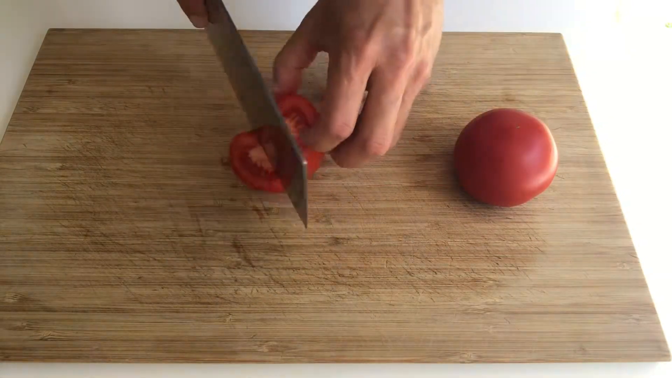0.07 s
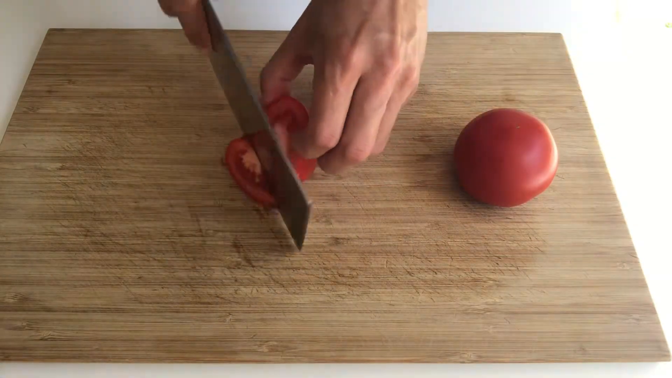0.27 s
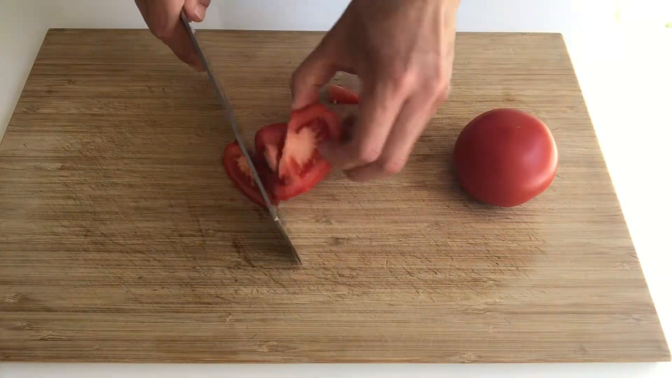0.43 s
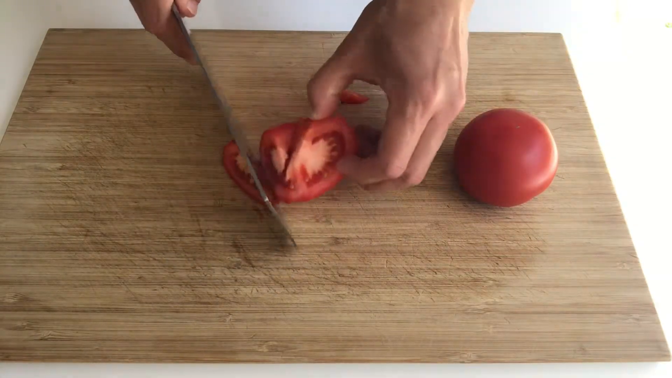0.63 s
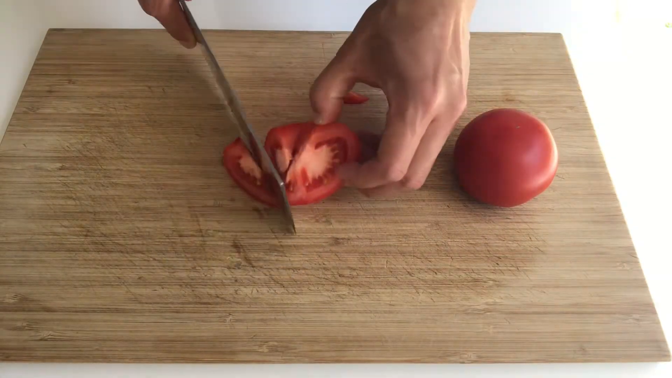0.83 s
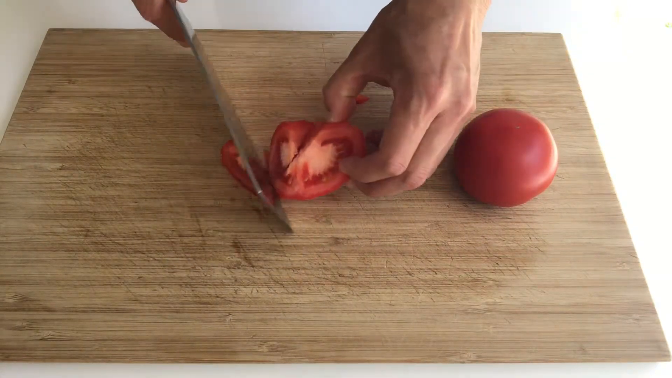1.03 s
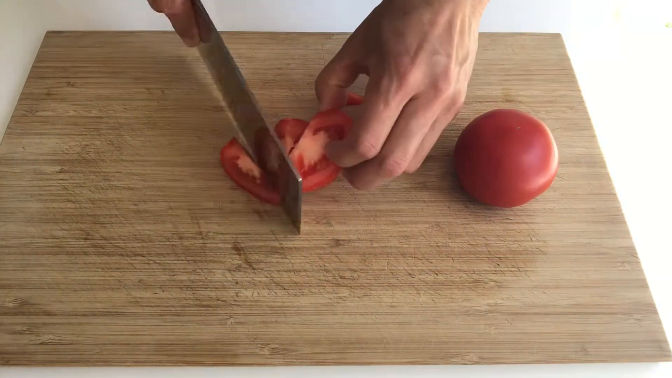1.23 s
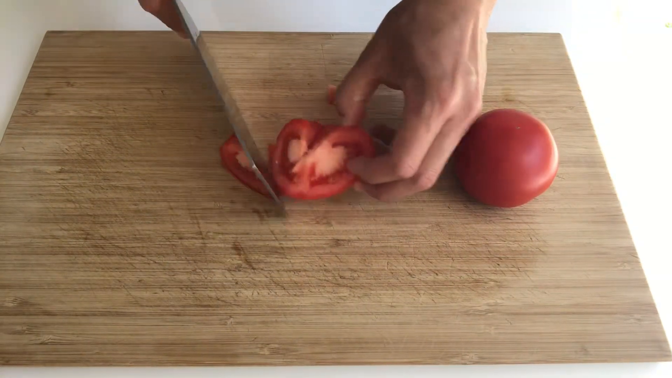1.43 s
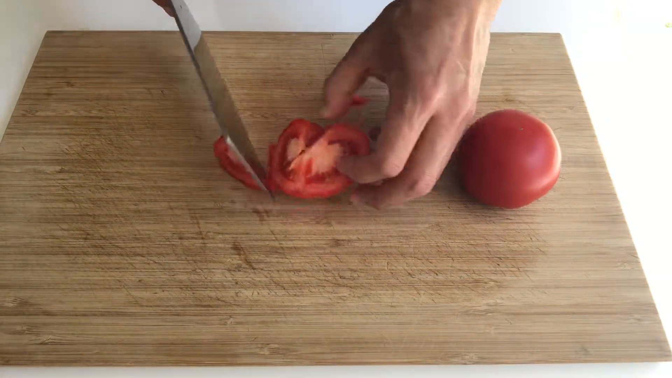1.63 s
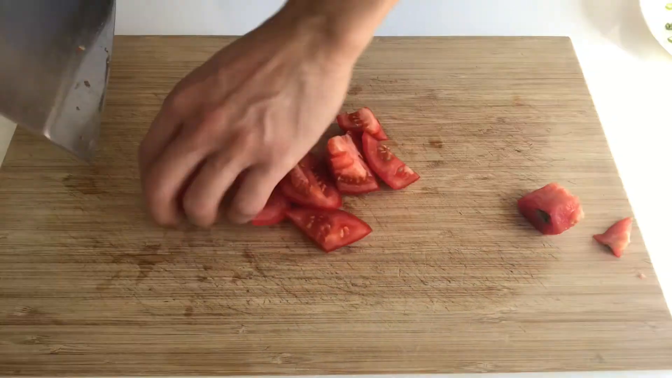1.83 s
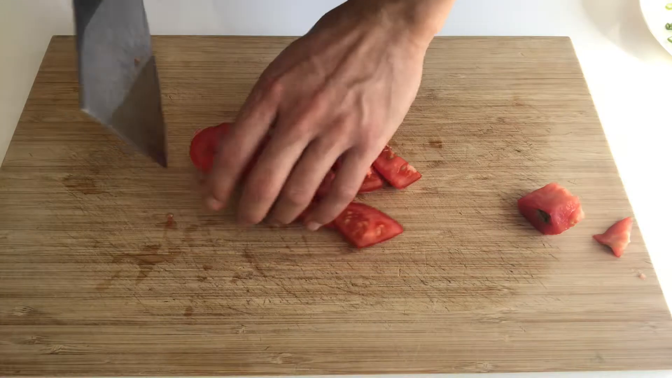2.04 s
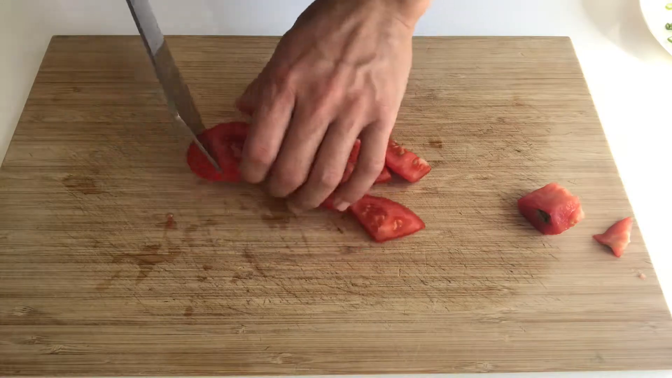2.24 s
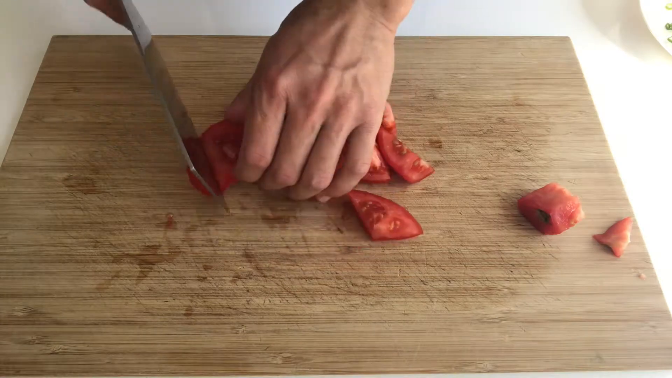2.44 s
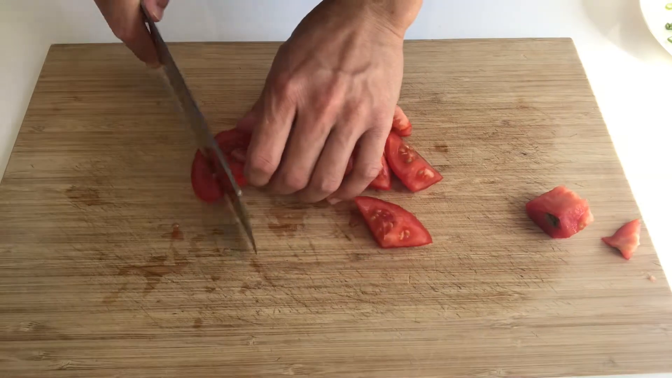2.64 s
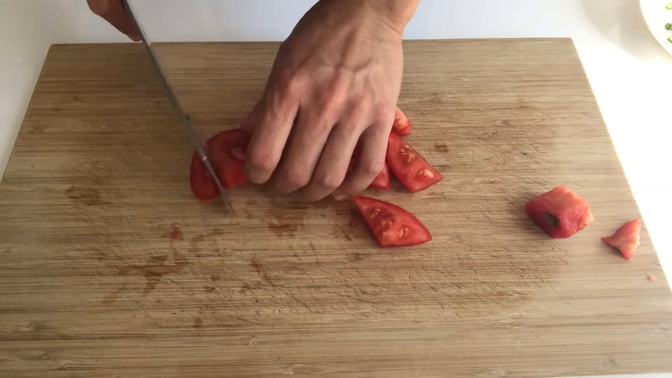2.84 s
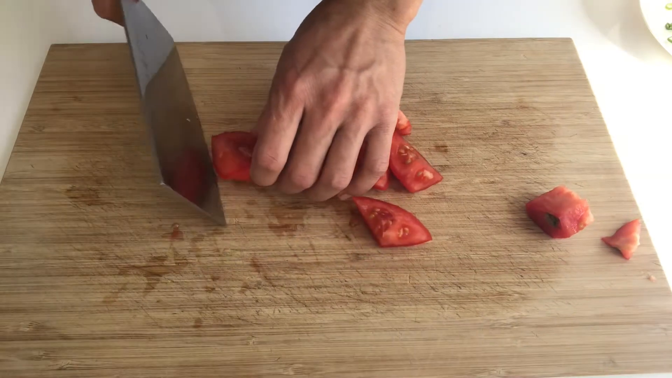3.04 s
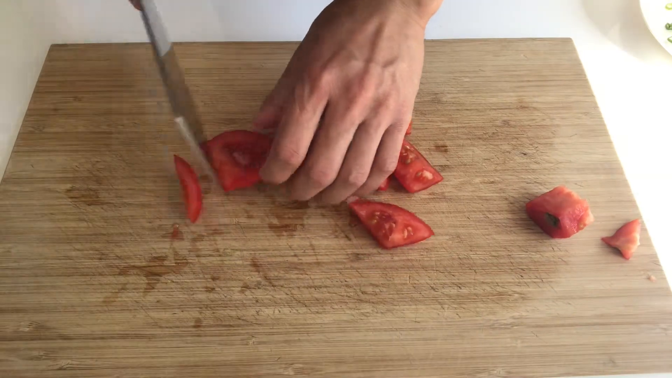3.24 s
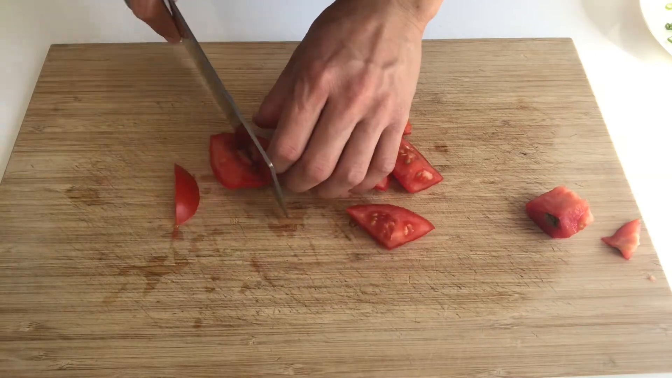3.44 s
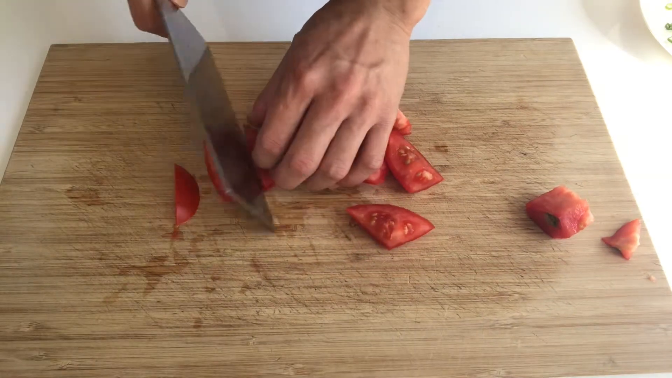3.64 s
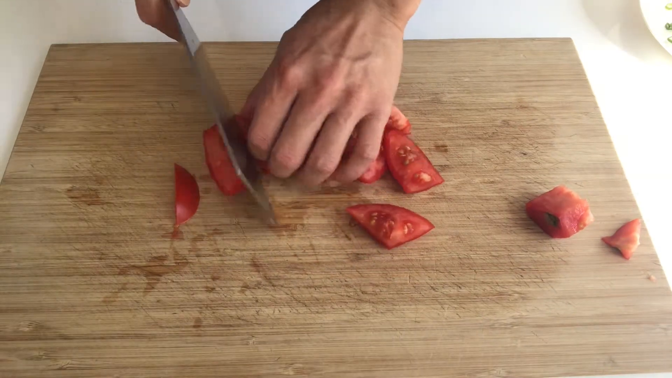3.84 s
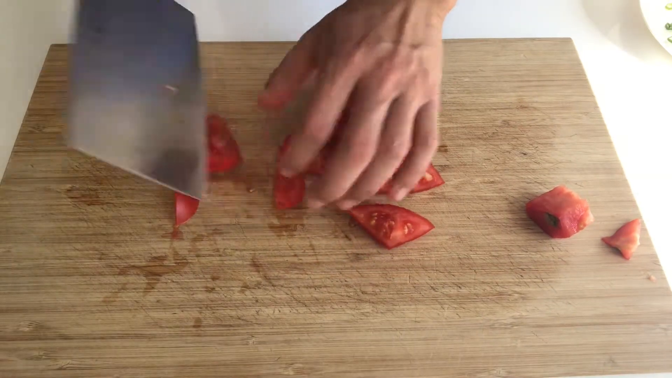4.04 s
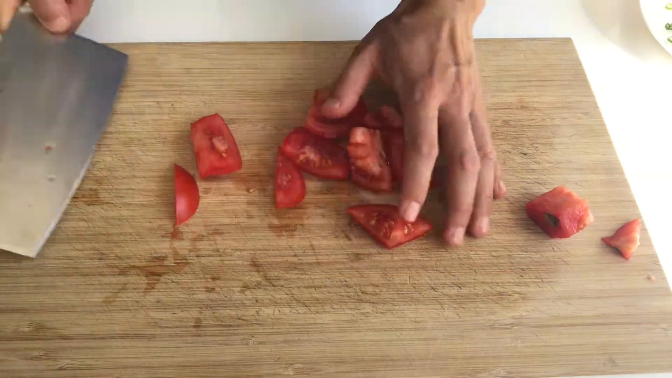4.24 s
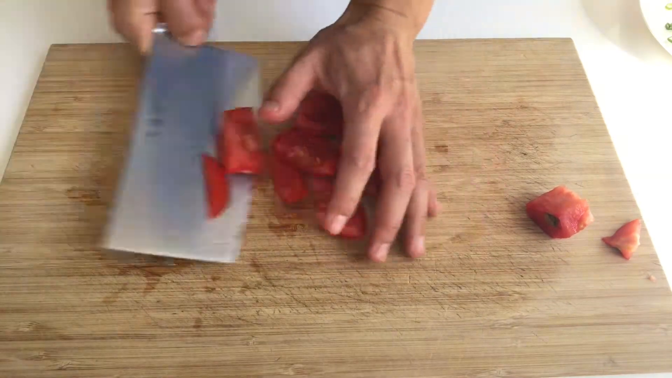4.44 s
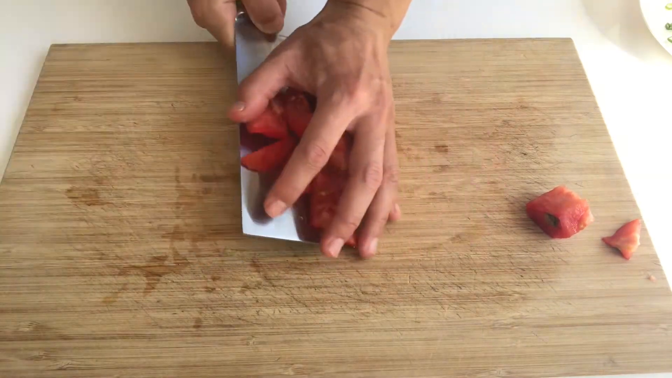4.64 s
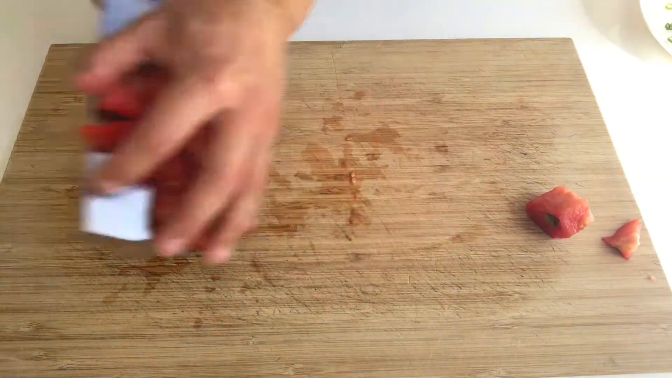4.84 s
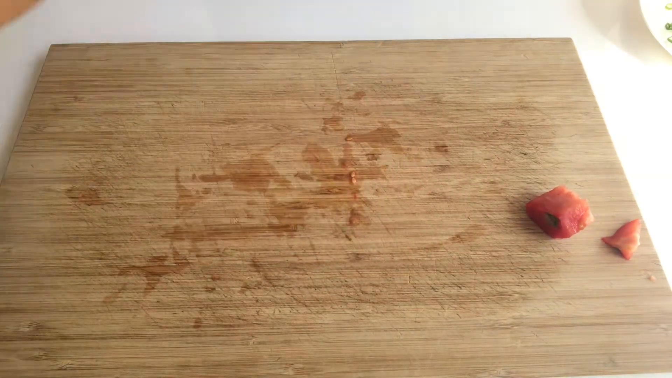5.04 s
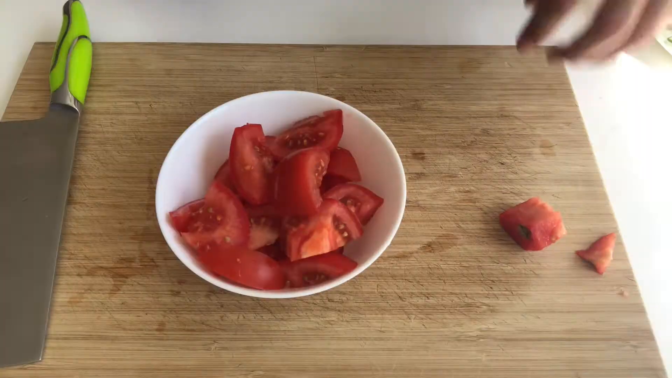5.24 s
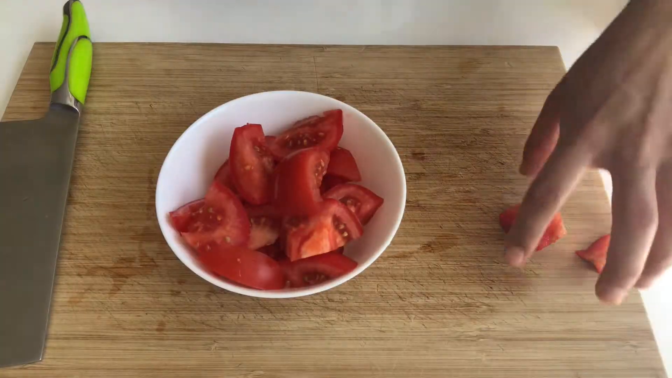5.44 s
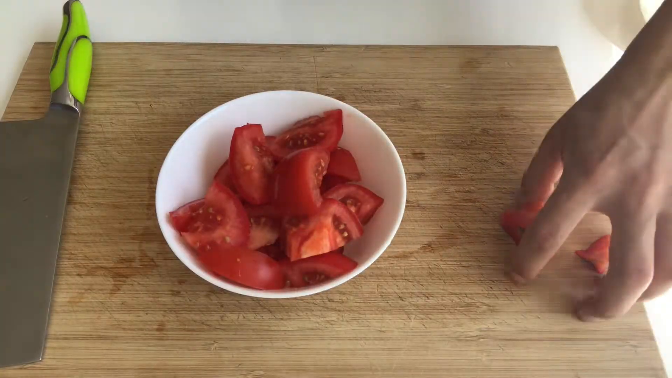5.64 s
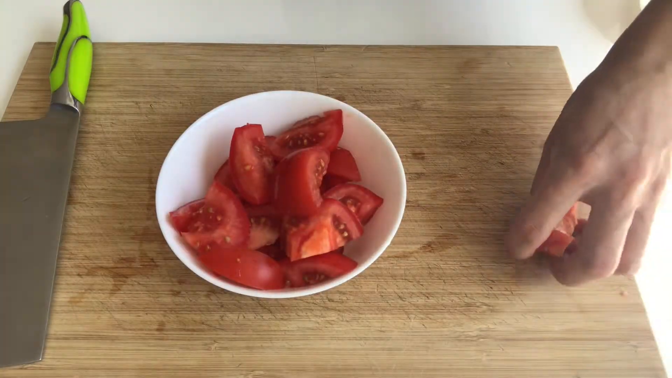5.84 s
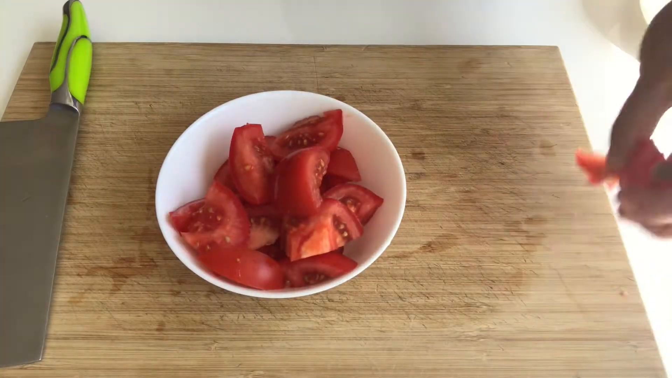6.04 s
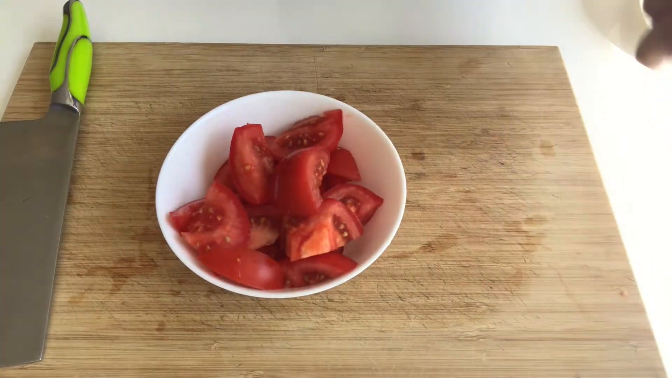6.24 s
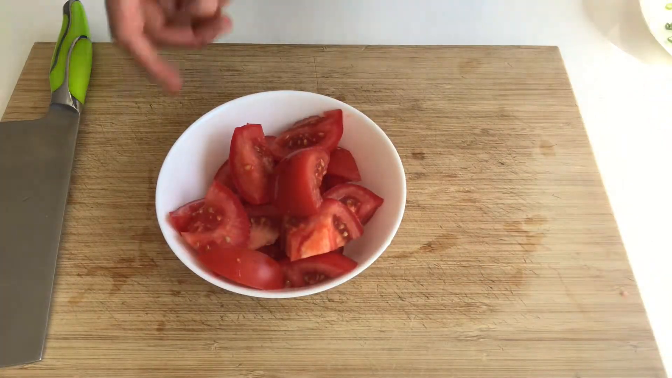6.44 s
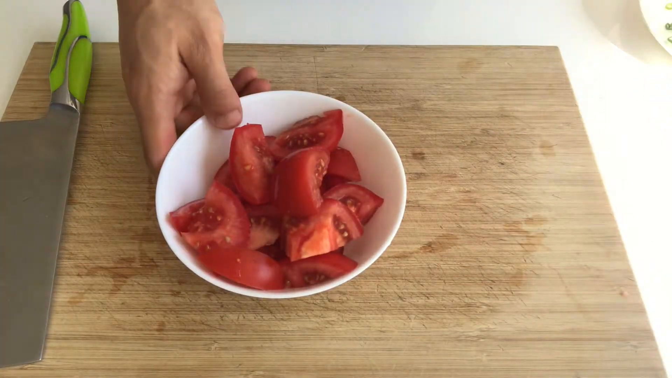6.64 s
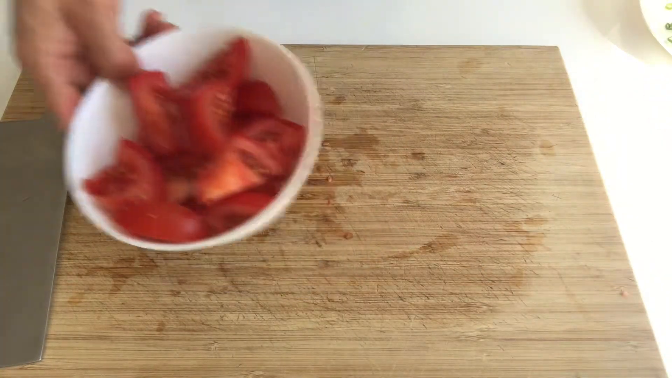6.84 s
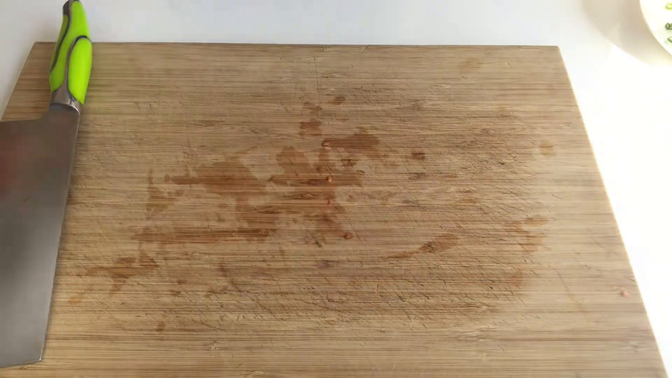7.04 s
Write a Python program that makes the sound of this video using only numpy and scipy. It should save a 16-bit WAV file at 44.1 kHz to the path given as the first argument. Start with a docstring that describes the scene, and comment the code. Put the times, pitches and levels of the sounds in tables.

```python
"""A wet tear of tomato skin, then the knock of a cleaver on a wooden board in a small, quiet kitchen.
Tears and scrapes are trains of tiny slips filtered by flesh, wood or steel; knocks are dying modes and noise.
Something on the counter wobbles after the first chop, as a row of dull, slightly detuned modal knocks.
The flat blade scrapes the pieces together and scoops them up, booming in its modes and squeaking by stick-slip.
A hand wipes up the scraps and takes a china bowl: soft thuds, grainy ticks and two faint ringing taps."""
import sys
import numpy as np
from scipy import signal
from scipy.fft import rfft, irfft
from scipy.io import wavfile

SR = 44100
rng = np.random.default_rng(int(sys.argv[2]) if len(sys.argv) > 2 else 0)


def unload_audio(sound):
    """Save the sound as a 16-bit wav file, at the path given as the first command line argument."""
    columns = np.transpose(np.atleast_2d(sound))
    # keep every value between -1 and 1, then stretch to whole-number steps
    steps = np.round(np.clip(columns, -1, 1) * 32767)
    wavfile.write(sys.argv[1], SR, steps.astype(np.int16))


N = 313110
TIME, BINS = np.arange(N) / SR, np.fft.rfftfreq(N, 1 / SR)  # s, Hz
AGE = TIME[:SR]  # s since the start of one event


def amp(db):
    """Level: decibels to amplitude gain."""
    return 10 ** (np.asarray(db) / 20)


def unit(x):
    """Normalisation: scales to rms 1."""
    return x / np.sqrt(np.mean(x ** 2) + 1e-20)


def read(points, hz):
    """Interpolation: reads a table on a log-frequency axis."""
    f, value = np.transpose(points)
    return np.interp(np.log(hz + 1), np.log(f + 1), value)


def add(mix, s, sound):
    """Superposition: adds a sound into the mix at time s."""
    part = mix[round(s * SR):][:len(sound)]
    part += sound[:len(part)]


def colour(x, gain):
    """Linear filtering: applies a gain per frequency, then scales to rms 1."""
    return unit(irfft(rfft(x) * gain, N))


def noise(gain):
    """Random excitation: coloured noise of rms 1."""
    return colour(rng.standard_normal(N), gain)


def below(hz):
    """Low-pass response: gain per frequency with a steep fall above hz."""
    return 1 / np.sqrt(1 + (BINS / hz) ** 10)


def lorentz(modes):
    """Resonance: sum of Lorentzian gain peaks, each with its half-gain width."""
    return sum(amp(db) / (1 + (2 * (BINS - hz) / width) ** 2) for hz, width, db in modes)


def onset(rise_s):
    """Build-up: an exponential approach to 1."""
    return 1 - np.exp(-AGE / rise_s)


def ring(modes, rise):
    """Modal decay: dying sines of alternating sign that build up over the rise time."""
    total = 0
    for k, (hz, db, t60) in enumerate(modes):
        envelope = amp(db - 60 * AGE / t60)
        total = total + (-1) ** k * envelope * np.sin(2 * np.pi * hz * AGE)
    return total * onset(rise)


def burst(decay):
    """Impulse envelope: swells to 1 in the given time and dies away."""
    return AGE / decay * np.exp(1 - AGE / decay)


def stroke(swell, hold, t60):
    """Contact pressure: builds as a power of time, holds and is let go exponentially."""
    t = np.arange(0, swell + hold + 1.2 * t60, 1 / SR)
    build = np.minimum(t / swell, 1) ** 1.5
    return build * amp(-60 * np.maximum(t - swell - hold, 0) / t60)


def wander(x, depth_db):
    """Time-varying resonance: smoothed random gains let parts of the spectrum swell and others fade."""
    z = signal.stft(x, nperseg=1024, noverlap=768)[2]
    smoothing = np.outer(np.hanning(6), np.hanning(16))  # across frequency and time
    field = signal.fftconvolve(rng.standard_normal(z.shape), smoothing, "same")
    varied = z * amp(depth_db * unit(field))
    return unit(signal.istft(varied, nperseg=1024, noverlap=768)[1][:N])


def friction(strokes, spectrum_db, per_s, spread_db, judder_db):
    """Slip noise: clumped tiny slips sound in board (low), blade (middle) and juice (high)."""
    sizes = amp(spread_db * np.minimum(rng.exponential(1, N), 4))
    slips = rng.standard_normal(N) * sizes * (rng.random(N) < per_s / SR)
    judder = amp(judder_db * noise(below(150)))
    slips = wander(slips * judder, depth_db=3.8)  # the contact point slides
    low, top = below(1500), below(5000)
    bands = np.array([colour(slips, amp(spectrum_db) * band) for band in (low, top - low, 1 - top)])
    power = np.zeros((3, N))  # overlapping strokes add in power
    for s, swell, hold, t60, db, fizz_db, push_db in strokes:
        pressure = amp(db) * stroke(swell, hold, t60)
        for band, share_db in zip(power, (push_db, 0, fizz_db)):
            add(band, s, (amp(share_db) * pressure) ** 2)
    return (np.sqrt(power) * bands).sum(0)


# spectrum of the quiet air: [pitch_hz, level_db]
AIR_SPECTRUM = [(15, -44), (25, -15), (54, 0), (107, 1), (250, 4), (382, -4.5), (554, -5), (666, -10.5),
                (722, -8), (2190, -12), (4850, -17.5), (6160, -17.5), (8470, -23.5), (14000, -24)]


def hush():
    """Ambient noise: the coloured, slowly quieter air of the kitchen."""
    start_db, fade_db_per_s = -60, 0.57
    return amp(start_db - fade_db_per_s * TIME) * noise(amp(read(AIR_SPECTRUM, BINS)))


# first echoes, relative to a tail of unit energy, before the room colour: [delay_s, level_db]
WALL_ECHOES = [(0.011, -14), (0.0218, -17), (.034, -22.5)]
# decay time of the reflections: [pitch_hz, t60_s]
ROOM_T60 = [(130, 0.85), (400, 0.16), (1000, 0.5), (2500, 0.55), (6000, 0.78), (14000, .25)]
# colour of the whole room response: [pitch_hz, level_db]
ROOM_COLOUR = [(50, -18), (130, -5.5), (350, 2.5), (1000, 5.5), (1500, -4.5), (3000, -15), (6000, -14),
               (14000, -9)]


def kitchen(x, gap=0.0013, build=0.0013):
    """Reverberation: near walls over dense reflections; each band dies at its own speed."""
    taps = rng.choice([-1., 1.], SR) * (rng.random(SR) < 4000 / SR)
    taps = taps * (1 - np.exp(-np.maximum(AGE - gap, 0) / build))
    hz, t, z = signal.stft(taps, SR, nperseg=512)
    decay = amp(-60 * t / read(ROOM_T60, hz)[:, None])
    tail = signal.istft(z * decay, SR, nperseg=512)[1][:SR]
    tail = tail / np.linalg.norm(tail)
    for delay, db in WALL_ECHOES:
        tail[round(delay * SR)] += amp(db)
    tail = irfft(rfft(tail, N) * amp(read(ROOM_COLOUR, BINS)), N)[:SR]
    return signal.fftconvolve(x, tail)[:N]


# something thin and metallic nearby is set rattling: [start_s, level_db]
RATTLES = [(.47, -55.5), (4.72, -61), (5.96, -52.5)]
# its resonances: [pitch_hz, width_hz, level_db]
RATTLE_MODES = [(625, 75, 0), (1223, 240, -4.5), (1856, 370, -2.5), (2350, 140, 6), (2710, 300, -16),
                (3085, 270, -1), (4450, 970, -17.5)]


def rattle():
    """Resonant noise: thin metal shivers in a few resonances and settles."""
    level = np.zeros(N)
    for s, db in RATTLES:
        add(level, s, amp(db) * stroke(swell=0.023, hold=0.11, t60=0.82))
    return level * wander(noise(lorentz(RATTLE_MODES)), depth_db=6)


# dull knocks as a loose thing rocks: [start_s, level_db, upper_modes_db]
WOBBLES = [(0.614, -26.5, -16), (.716, -23.5, 2.5), (0.832, -21, 0), (.947, -19.5, -0.5), (1.06, -30, -16),
           (1.099, -23, 1), (1.222, -22.5, -8), (1.3, -36, 1), (1.393, -25.5, -15), (1.458, -34, -2),
           (1.551, -32, -1), (1.64, -40, 5), (1.704, -37, -8), (1.806, -41, -17), (1.879, -40.5, -22)]
# its modes before the chance shifts of each landing: [pitch_hz, level_db, t60_s]
WOBBLE_MODES = [(204.4, 5, 0.29), (250, -17.5, 0.15), (316.9, 0.5, 0.16), (357.7, -13.5, 0.083),
                (413.7, -7.5, 0.2), (532, -20, 0.25), (570.5, -19.5, 0.22), (720, -18, 0.053)]
# the rough contact of each landing: [pitch_hz, level_db]
SCUFF_SPECTRUM = [(120, -14), (330, 13), (650, -2.5), (850, -12.5), (1050, -5.5), (1500, -15.5),
                  (2200, -19.5), (4000, -27.5), (12000, -45)]


def wobbles(low_db=-14, scatter_db=2, detune=.025, scuff_db=-5, scuff_decay=0.016):
    """Modal excitation: each soft landing scuffs and shares its force differently among the modes."""
    out, scuff = np.zeros(N), noise(amp(read(SCUFF_SPECTRUM, BINS)))
    for s, db, upper_db in WOBBLES:
        share = [(203, low_db), (313, 0), (409, upper_db)]  # Hz, dB
        chance = rng.standard_normal((len(WOBBLE_MODES), 2))
        modes = []
        for (hz, size, t60), (shift, luck) in zip(WOBBLE_MODES, chance):
            mode_db = size + read(share, hz) + scatter_db * luck
            modes.append((hz * (1 + detune * shift), mode_db, t60))
        contact = scuff[round(s * SR):][:SR] * np.exp(-AGE / scuff_decay) * onset(0.0061)
        add(out, s, amp(db) * (ring(modes, rise=0.005) + amp(scuff_db) * contact))
    return out


# fingers take the bowl: [start_s, level_db]
BOWL_TAPS = [(6.693, -58), (6.739, -63)]
# modes of the china bowl: [pitch_hz, level_db, t60_s]
BOWL_MODES = [(1840, 2.5, 0.083), (3090, 2.5, 0.085), (4500, -6, 0.11), (6480, 1, 0.056), (8570, -9, .1)]


def bowl_taps():
    """Free vibration: the china bowl rings under the fingers."""
    out = np.zeros(N)
    for s, db in BOWL_TAPS:
        add(out, s, amp(db) * ring(BOWL_MODES, rise=0.00073))
    return out


# light wet ticks and taps: [start_s, level_db, pitch_hz]
CLINKS = [(5.565, -50.5, 850), (5.586, -53, 900), (5.611, -42, 1050), (5.644, -58, 1036),
          (5.963, -47, 2000)]


def clinks(width=0.71, grain_db=3.5):
    """Band noise: small taps around one pitch, roughened by a random grain."""
    out, grain = np.zeros(N), amp(grain_db * noise(below(240)))
    for s, db, hz in CLINKS:
        grit = noise(lorentz([(hz, hz * width, 0)]) ** 2) * grain
        grit = np.roll(grit, -round(s * SR))[:SR]
        add(out, s, amp(db) * burst(0.0062) * grit)
    return out


# hand or blade leans on the board: [start_s, rocking_db, bending_db]
THUDS = [(.281, -60, -37.5), (0.347, -21.5, -24), (0.382, -44.5, -27.5), (1.571, -41.5, -61),
         (2.5, -58.5, -35), (2.558, -52, -30.5), (2.991, -46, -54.5), (3.447, -20.5, -33),
         (4.083, -63, -48.5), (4.62, -35, -37), (5.687, -43.5, -46.5), (5.763, -39, -38.5),
         (6.745, -46, -57.5)]


def thuds():
    """Damped oscillation: leaned on, the board rocks on its feet and bends for a few low cycles."""
    out = np.zeros(N)
    rock = burst(0.0051) * np.sin(2 * np.pi * 70.9 * AGE)
    bend = burst(0.033) * np.sin(2 * np.pi * 134.9 * AGE)
    for s, rock_db, bend_db in THUDS:
        add(out, s, amp(rock_db) * rock + amp(bend_db) * bend)
    return out


# soft blows of fingertips or blade on the board: [start_s, level_db]
SOFT_KNOCKS = [(.353, -24), (2.61, -38), (2.65, -25.5), (3.019, -45.5), (3.47, -33), (3.62, -44.5),
               (4.091, -44), (4.16, -56.5), (5.761, -32.5), (5.81, -29.5), (6.387, -56)]
# the board under a soft blow: [pitch_hz, width_hz, level_db]
PAD_MODES = [(136, 33, -5), (199, 32, 7.5), (404, 100, 0.5), (625, 160, -14.5), (1000, 300, -21)]


def soft_knocks(t60=.25):
    """Damped resonance: a soft blow gives a short dull bump of resonant noise."""
    out, pad = np.zeros(N), noise(lorentz(PAD_MODES))
    for s, db in SOFT_KNOCKS:
        bump = np.roll(pad, -round(s * SR))[:SR]
        add(out, s, amp(db - 60 * AGE / t60) * onset(0.0024) * bump)
    return out


# wet steel sticks and sings for a moment: [start_s, level_db, first_hz, last_hz]
SQUEAKS = [(.76, -38.5, 2250, 2375), (1.502, -36.5, 1688, 1927), (2.75, -34, 1590, 1877),
           (2.83, -40, 1884, 1775), (3.525, -29, 2450, 2670), (3.95, -39.5, 1963, 1850),
           (4.42, -26, 1735, 1782), (4.467, -28, 2000, 2060), (4.53, -22, 2120, 2117),
           (4.541, -22, 3610, 3550)]


def squeaks(length_s=0.07):
    """Stick-slip: slips lock onto one mode, giving a short, rough, gliding tone."""
    out, roughness = np.zeros(N), noise(below(130))
    size = round(length_s * SR)
    for s, db, first_hz, last_hz in SQUEAKS:
        turns = np.cumsum(np.linspace(first_hz, last_hz, size)) / SR
        rough = roughness[round(s * SR):][:size]
        tone = np.sin(2 * np.pi * turns + .5 * rough[::-1])
        add(out, s, amp(db) * np.hanning(size) * (1 + 0.39 * rough) * tone)
    return out


# edge or fingers drag lightly over the wet wood:
# [start_s, swell_s, hold_s, release_t60_s, level_db, fizz_db, push_on_board_db]
SCRAPES = [(.39, 0.0091, 0.012, 0.44, -45.5, -20, 1), (.54, 0.021, 0.13, 0.37, -66, -28, 14),
           (2.72, 0.049, 0.089, 0.24, -39.5, -9.5, 2), (2.37, 0.026, .01, 0.39, -69.5, 2.5, 2),
           (3.15, 0.032, 0.018, 0.27, -67, -21, 1.5), (2.92, 0.034, 0.066, 0.12, -53.5, -1, 4.5),
           (3.46, .1, 0.0046, 0.17, -34.5, -6.5, 3.5), (3.655, 0.0053, 0.061, .12, -40.5, -9, 0),
           (3.725, 0.026, 0.011, 0.21, -39.5, -4, 2.5), (3.89, 0.013, .03, 0.17, -52, -14.5, 10.5),
           (3.895, .055, 0.076, 0.14, -43.5, -11, 3), (4.06, 0.0076, 0.0047, .25, -56.5, -7.5, 8.5),
           (5.72, 0.047, 0.035, 0.15, -51, -23, 5.5), (5.8, 0.015, .012, 0.28, -40, -15, 0.5),
           (6.38, .04, .08, 0.27, -72.5, 3.5, 3)]
# spectrum of the wood grain: [pitch_hz, level_db]
GRAIN_SPECTRUM = [(45, -7.5), (140, 3), (220, 6.5), (380, 9), (540, 1), (1050, 2), (1400, 1), (1850, 1.5),
                  (2500, -2.5), (3400, -6.5), (4900, -11.5), (6100, -4), (8300, -10.5), (14000, -17)]


def scrapes():
    """Dry-contact friction: light strokes rasp on the wood grain."""
    return friction(SCRAPES, read(GRAIN_SPECTRUM, BINS), per_s=21000, spread_db=1.5, judder_db=1.5)


# the flat blade lands and is shoved under the pieces:
# [start_s, swell_s, hold_s, release_t60_s, level_db, fizz_db, push_on_board_db]
SCOOP = [(4.305, 0.02, 0.033, .03, -53.5, -9.5, 8), (4.345, 0.0024, 0.0046, 0.1, -30.5, -16.5, 3.5),
         (4.35, 0.13, 0.031, 0.11, -28, 0, -2), (4.485, 0.056, 0.066, 0.31, -21, -3.5, -5),
         (4.73, 0.044, 0.0057, 0.16, -37.5, -19, -13.5), (5.1, .11, 0.024, 0.077, -66, -3, -3)]
# spectrum of the steel rasp: [pitch_hz, level_db]
STEEL_SPECTRUM = [(45, -14.5), (130, -0.5), (350, 1.5), (520, -3.5), (900, -1), (2000, -1.5), (3000, -4.5),
                  (4100, -4), (4900, -8.5), (6000, -5), (7500, -10.5), (10500, -15), (13000, -11.5),
                  (14500, -15)]
# the blade sings as it is dragged, resonances added to a gain of 1: [pitch_hz, width_hz, level_db]
BLADE_MODES = [(1421, 30, 5.5), (1820, 20, 2), (2139, 25, 9), (2270, 27, 0), (2420, 47, -4), (3075, 25, 7),
               (3220, 25, 2.5), (3770, 25, 7), (4190, 20, 5.5), (4340, 25, 4), (5580, 64, 3.5),
               (6250, 47, 8.5), (6900, 75, 4), (8226, 64, 9.5), (9585, 170, 3.5), (12150, 56, 2)]


def scoop():
    """Friction-driven resonance: the flat blade is shaken, and its modes stand out of the rasp."""
    spectrum_db = read(STEEL_SPECTRUM, BINS) + 20 * np.log10(1 + lorentz(BLADE_MODES))
    return friction(SCOOP, spectrum_db, per_s=18000, spread_db=-0.5, judder_db=0.83)


# skin and seeds snap under the edge: [start_s, level_db, low_part_db]
SNAPS = [(0.3506, -28, 5.5), (.586, -45.5, -6), (0.849, -27.5, -4), (1.2187, -42, -0.5), (1.461, -36, -2),
         (1.513, -36, 3.5), (2.4895, -36, -6.5), (2.548, -19, -9), (2.9618, -31.5, -6), (2.998, -31, -21),
         (3.015, -31, -18), (3.455, -24, -6), (3.551, -25.5, -2.5), (3.669, -25.5, -9), (3.711, -34, 2),
         (3.7424, -24, -11.5), (4.7738, -33.5, 0), (5.765, -57, 14)]


def snaps():
    """Fracture impulses: each snap is a bright tick with a lower crackle under it."""
    out = np.zeros(N)
    high = noise((1 - below(4000)) * amp(-BINS / 2500))
    low = noise(below(4000) * (1 - below(1300)))
    for s, db, crackle_db in SNAPS:
        sound = (high + amp(crackle_db) * low)[round(s * SR):][:SR]
        add(out, s, amp(db) * sound * np.exp(-AGE / 0.0024) * onset(0.00048))
    return out


# edge and fingers pass through wet flesh:
# [start_s, swell_s, hold_s, release_t60_s, level_db, fizz_db, push_on_board_db]
SLICES = [(.266, 0.03, .09, 0.026, -37.5, -3, -7.5), (.7, 0.083, 0.035, 0.58, -45, -9, 9.5),
          (.885, 0.036, .01, 0.14, -44.5, -7.5, 4), (1.43, 0.039, .075, .33, -43, -6, 4.5),
          (1.86, 0.006, .02, 1, -66, -1, 8), (1.96, 0.0252, .1, 0.56, -72.5, -7.5, 5),
          (2.478, .078, .002, .015, -36, -1, 3), (2.57, 0.052, .022, 0.25, -49, -4.5, 13),
          (3.428, 0.028, 0.011, 0.082, -36.5, -3, -7)]
# spectrum of the flesh: [pitch_hz, level_db]
FLESH_SPECTRUM = [(50, -16.5), (130, 1), (250, 9.5), (420, 7), (700, -0.5), (1400, 0), (2400, 3.5),
                  (4000, -4), (6200, -6.5), (9000, -14), (14000, -19.5)]


def slices():
    """Wet friction: skin and pulp tear with a fine fizz."""
    return friction(SLICES, read(FLESH_SPECTRUM, BINS), per_s=6400, spread_db=-3.0, judder_db=1.5)


# the cleaver meets the board: [start_s, thump_db, crack_db, board_ring_db, blade_flex_db]
CHOPS = [(0.378, 2, -17, -26.5, -49.5), (2.5591, 1, -15, -23.5, -47.5), (3.549, -21, -27, -43, -47),
         (3.743, -31, -29, -51.5, -50.5), (4.3416, -3.5, -8.5, -36, -20.5)]
# bending modes of the blade laid flat, before the pieces damp it: [pitch_hz, level_db, t60_s]
FLEX_MODES = [(202, 3.5, 0.99), (356, -8, 0.3), (436, -16.5, .5), (764, -13, 0.45), (927, -15.5, .5),
              (1330, -15, 0.45), (1755, -4.5, 0.15)]


def flex(free_s=0.23, damped_t60=0.4):
    """Added damping: the slapped blade booms in its bending modes until the pieces press on it."""
    out = np.zeros(N)
    damping = amp(-60 * np.maximum(AGE - free_s, 0) / damped_t60)
    for s, *_, flex_db in CHOPS:
        add(out, s + 0.0043, amp(flex_db) * ring(FLEX_MODES, rise=.004) * damping)
    return out


# steel on wood: [pitch_hz, level_db]
CRACK_SPECTRUM = [(300, -27), (900, 5), (2500, 6), (4200, -0.5), (6200, -6), (8500, -19), (14000, -39)]
# the forced swing of the board under a blow: [pitch_hz, level_db, t60_s]
THUMP_MODES = [(230, 2.5, 0.02), (377, 2, 0.022), (630, 2, 0.011), (970, -9, 0.016), (1420, -12.5, 0.014)]
# free ringing of board and counter: [pitch_hz, level_db, t60_s]
BOARD_MODES = [(139, -9, .7), (202, -4, .6), (283, -8, .35), (349, -1, .3), (385, -6, .35), (465, -11, .4),
               (524, -8, .3), (640, -13, .45), (915, -16, .45), (988, -11, .45)]
# the many weaker modes of the counter blur into one short boom: [pitch_hz, level_db]
COUNTER_SPECTRUM = [(100, -26), (250, -0.5), (420, 5), (750, -3), (1050, -2.5), (1250, -21.5), (2500, -22),
                    (5000, -43.5)]


def chops(counter_db=-4, counter_t60=.48):
    """Impact: the edge cracks on the wood; the board gives way a moment later and rings with the counter."""
    out = np.zeros(N)
    crack, boom = noise(amp(read(CRACK_SPECTRUM, BINS))), noise(amp(read(COUNTER_SPECTRUM, BINS)))
    for s, thump_db, crack_db, ring_db, _ in CHOPS:
        at = slice(round(s * SR), round(s * SR) + SR)
        blur = boom[at] * amp(counter_db - 60 * AGE / counter_t60) * onset(0.0027)
        add(out, s, amp(crack_db) * burst(0.0012) * crack[at])
        add(out, s + 0.0013, amp(thump_db) * ring(THUMP_MODES, rise=0.0029))
        add(out, s + .004, amp(ring_db) * (ring(BOARD_MODES, rise=0.003) + blur))
    return out


def scene():
    """Superposition: all sources share one room and one microphone."""
    sources = [  # sound, dB sent to the room
        (wobbles(), -2.5),
        (clinks() + bowl_taps(), -13.5),
        (thuds() + soft_knocks() + flex(), -11.0),
        (scrapes() + scoop() + squeaks(), -8.5),
        (snaps(), -7.5),
        (slices(), -7.5),
        (chops(), -5.0),
    ]
    direct = sum(sound for sound, _ in sources)
    sent = sum(amp(send_db) * sound for sound, send_db in sources)
    mono = hush() + kitchen(sent) + rattle() + direct
    return np.array([mono, mono])


def record(dry, ceiling=0.89):
    """Transducer limits: deep bass is shed, the loudest peaks are rounded off, then the band is limited."""
    thinned = signal.sosfilt(signal.butter(4, 42, "highpass", fs=SR, output="sos"), dry)
    rounded = thinned / (1 + (thinned / ceiling) ** 6) ** (1 / 6)
    band_limit = signal.firwin(1023, 14300, window=("kaiser", 9), fs=SR)  # low-pass at 14300 Hz
    return signal.oaconvolve(rounded, band_limit[None], "same")


dry = scene()
out = record(dry)
unload_audio(out)
```